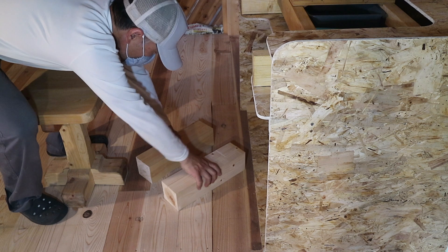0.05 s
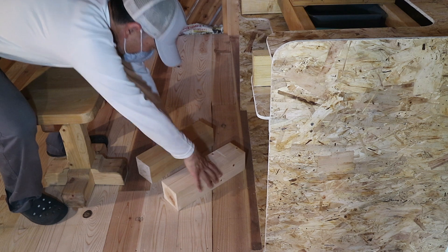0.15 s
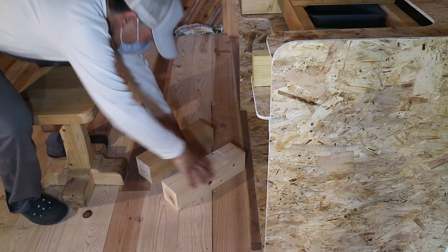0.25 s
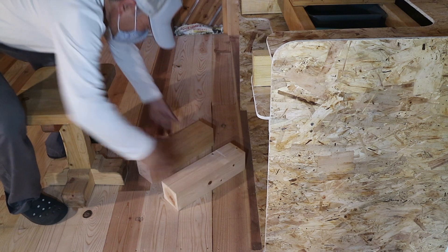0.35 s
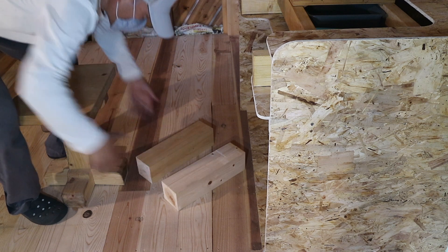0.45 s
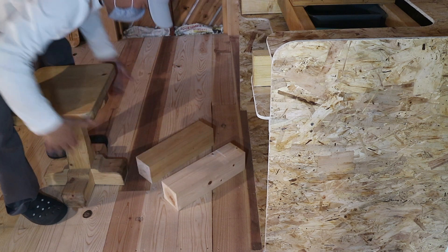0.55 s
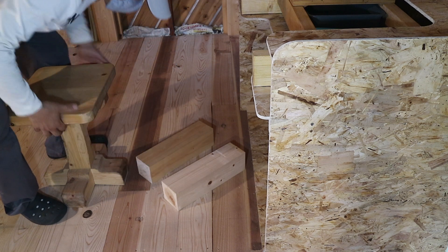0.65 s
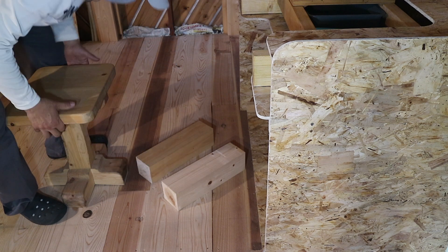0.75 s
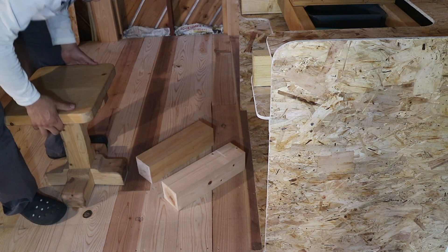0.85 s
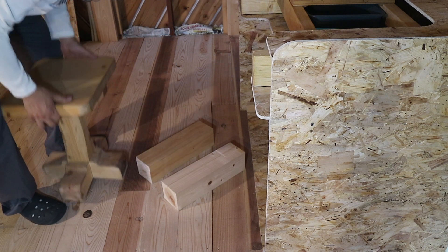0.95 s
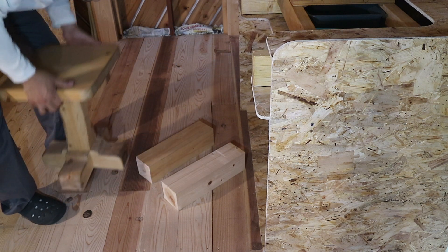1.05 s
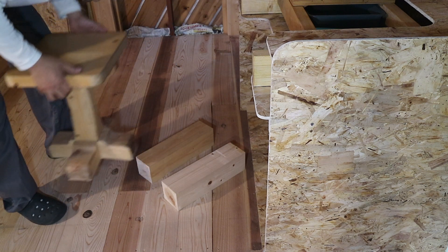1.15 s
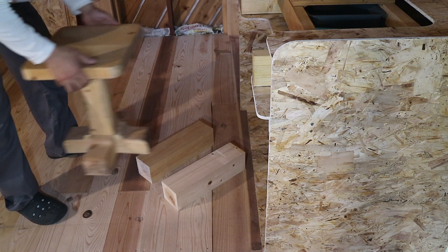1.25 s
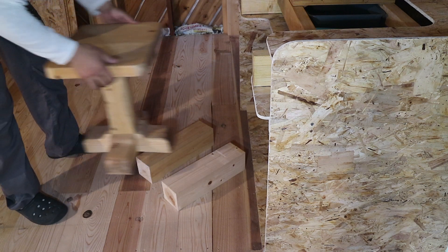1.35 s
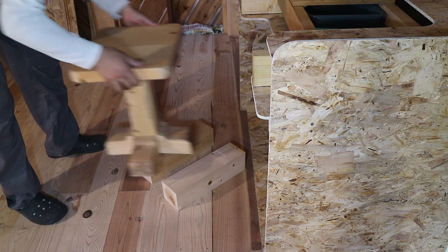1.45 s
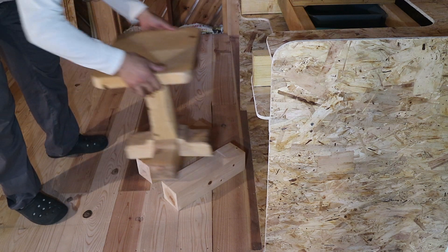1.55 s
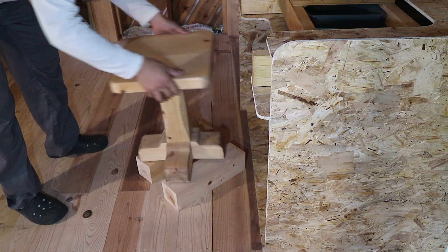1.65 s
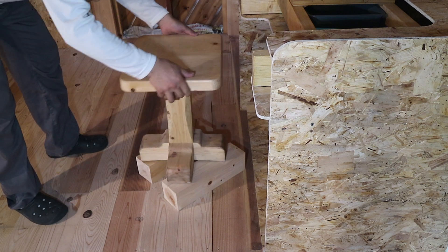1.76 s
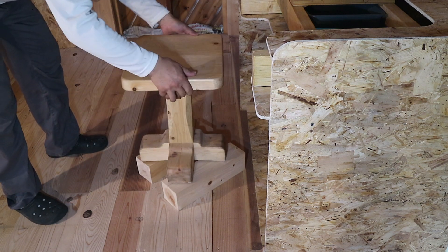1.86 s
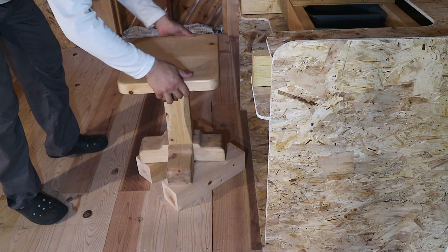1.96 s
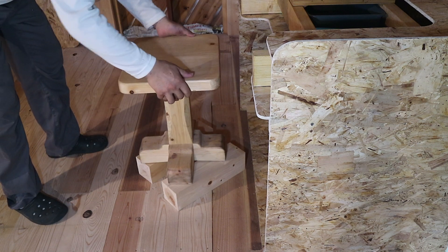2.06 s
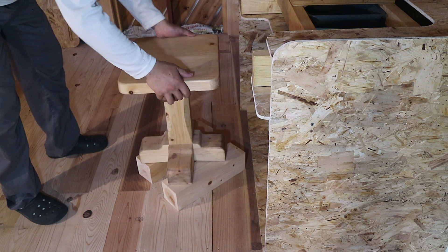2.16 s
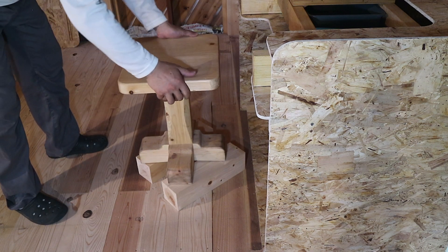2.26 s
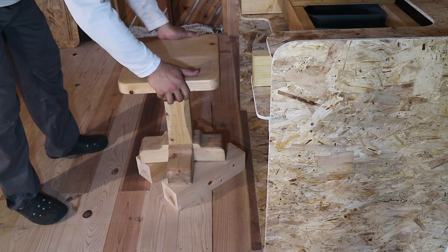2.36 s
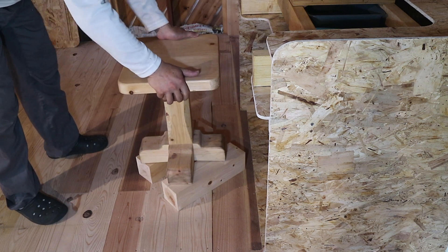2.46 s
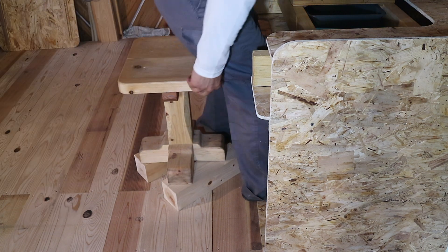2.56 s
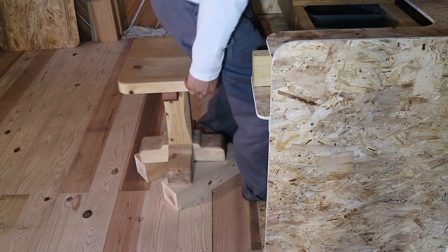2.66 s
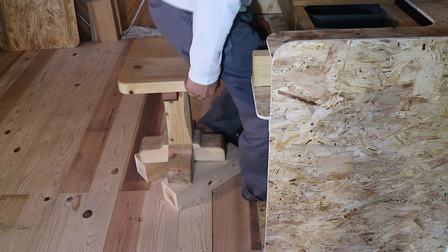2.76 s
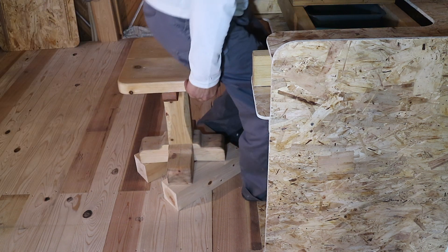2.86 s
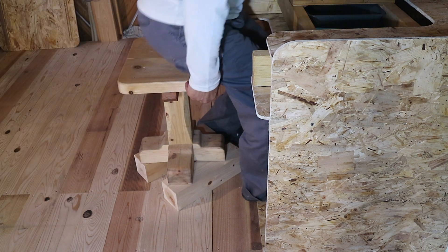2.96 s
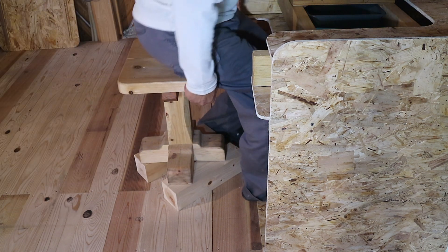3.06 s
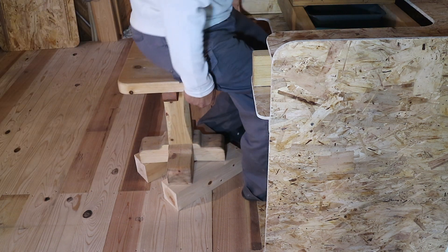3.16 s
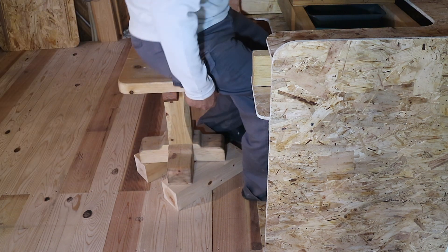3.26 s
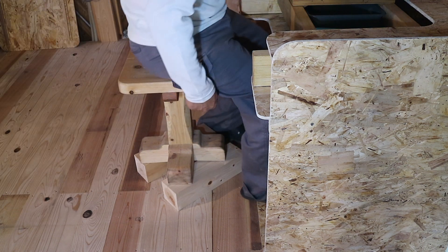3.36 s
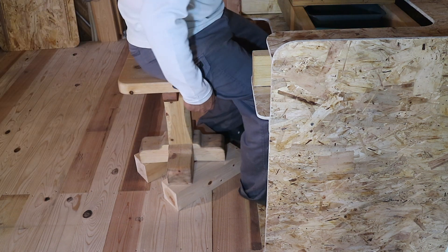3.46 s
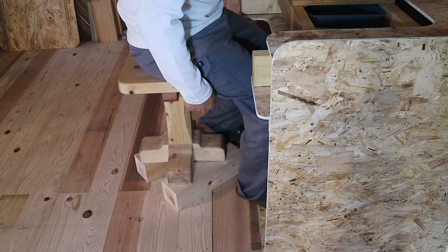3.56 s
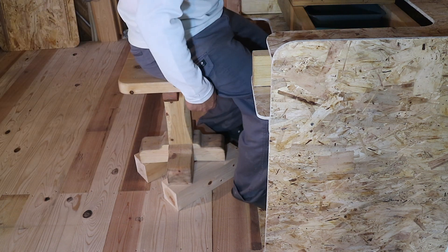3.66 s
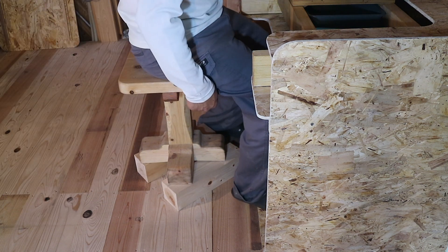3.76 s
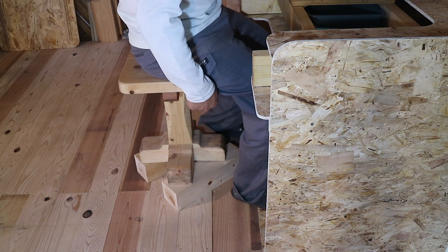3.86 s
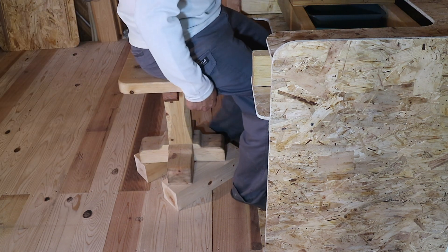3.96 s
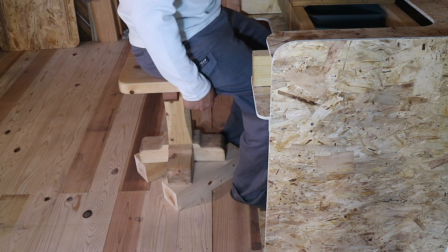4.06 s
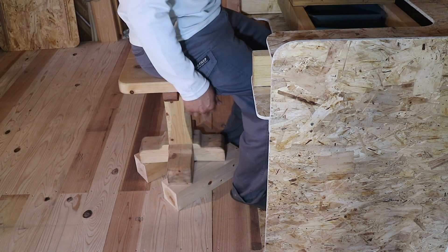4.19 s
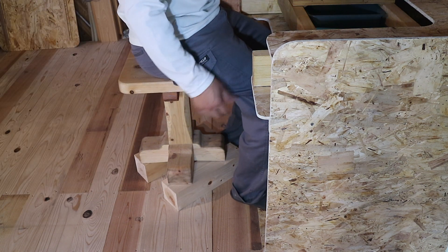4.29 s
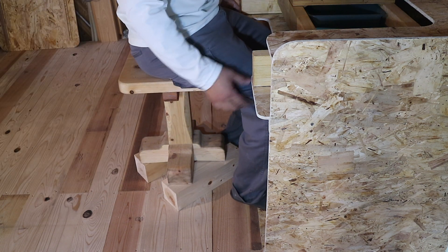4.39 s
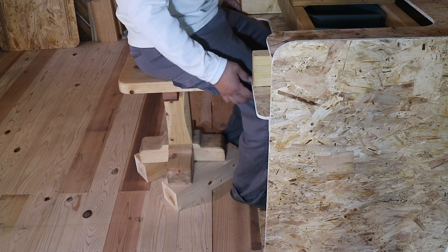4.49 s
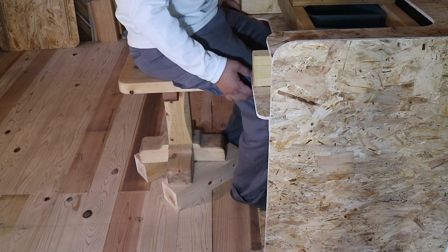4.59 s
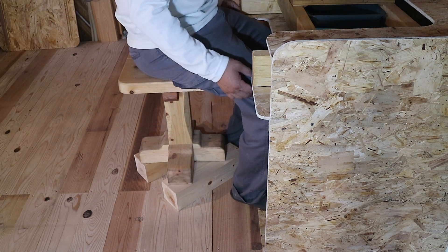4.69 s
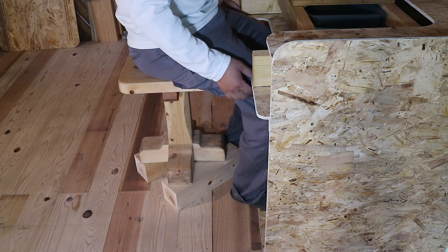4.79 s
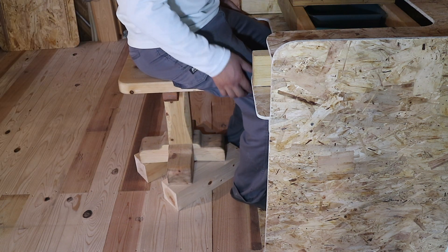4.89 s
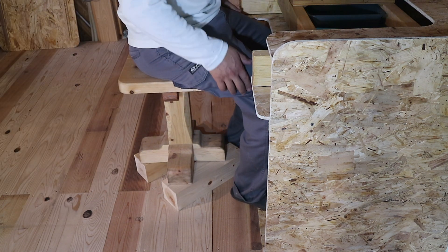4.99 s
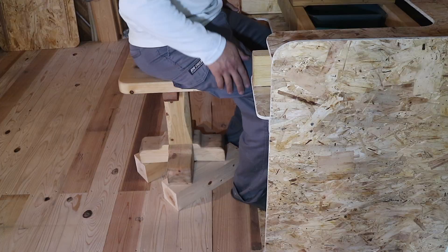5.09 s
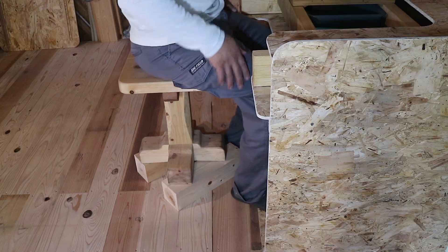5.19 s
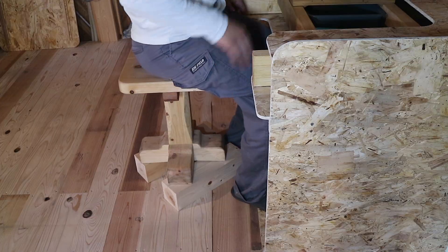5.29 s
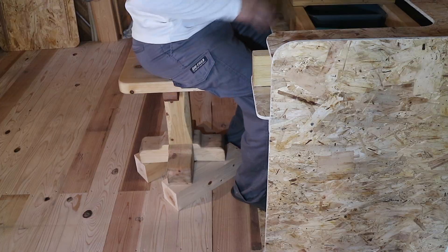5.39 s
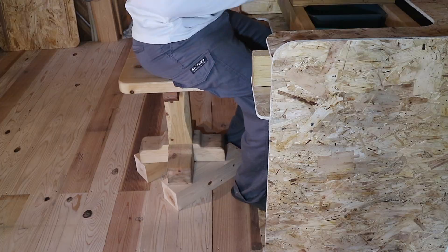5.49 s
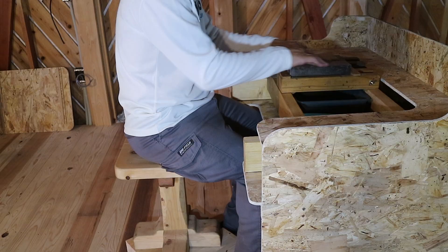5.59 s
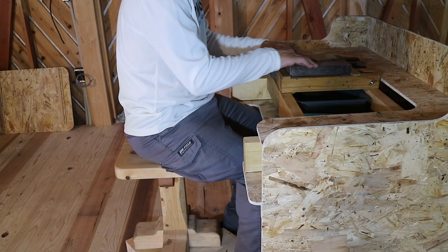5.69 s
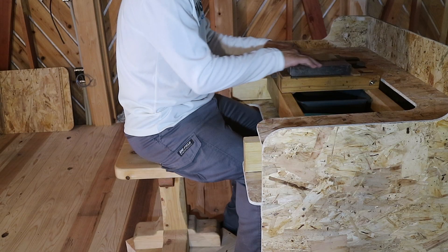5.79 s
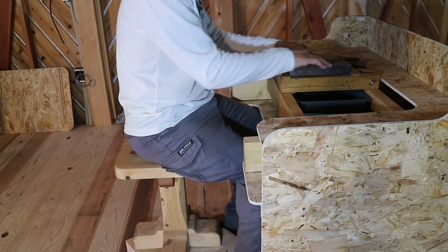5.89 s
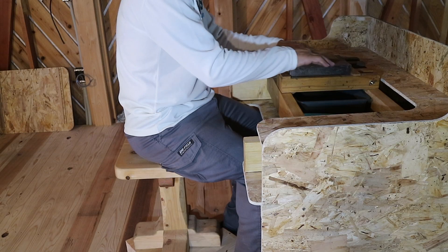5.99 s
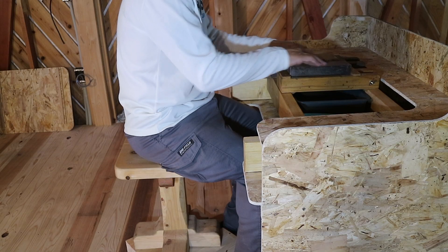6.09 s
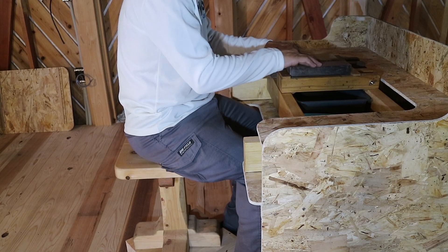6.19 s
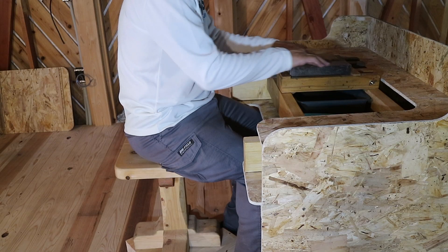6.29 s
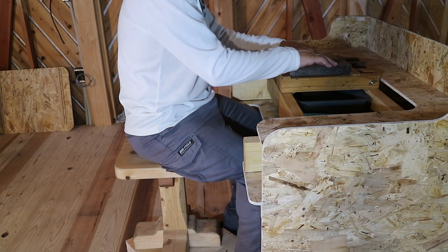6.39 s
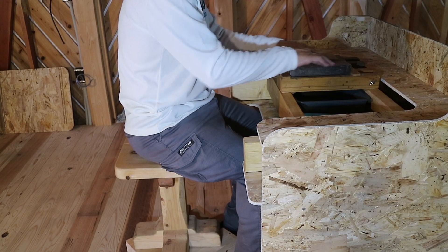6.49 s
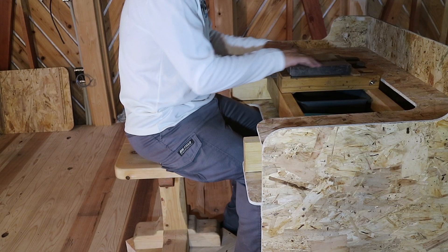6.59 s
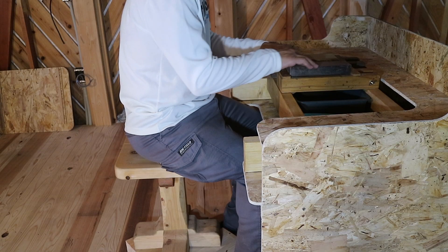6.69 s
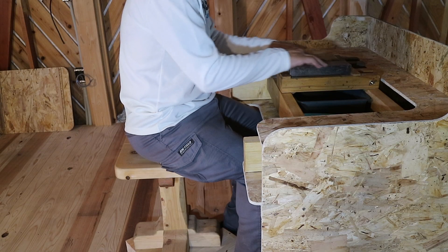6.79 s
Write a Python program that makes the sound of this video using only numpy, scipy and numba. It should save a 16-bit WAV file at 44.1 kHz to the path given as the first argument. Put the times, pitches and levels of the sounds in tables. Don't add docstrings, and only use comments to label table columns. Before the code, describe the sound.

Soft cloth rustle, then a loud hollow double clunk of a wooden stool, short drag, lighter knocks, a creak, and quiet blade-on-stone swishes.

```python
import sys
import numpy as np
from scipy import signal
from scipy.fft import rfft, irfft
from scipy.io import wavfile
from scipy.ndimage import uniform_filter1d
from numba import njit

SR = 44100
rng = np.random.default_rng(int(sys.argv[2]) if len(sys.argv) > 2 else 0)


def level_to_linear(level):
    exponent = np.asarray(level, float) / 20
    return 10 ** exponent


def put_to_file(sound):
    columns = np.atleast_2d(sound).T
    safe = np.clip(columns, -1, 1)
    whole_steps = np.round(safe * 32767)
    wavfile.write(sys.argv[1], SR, whole_steps.astype(np.int16))


N = 301644
TIME = np.arange(N) / SR
SIDES = np.array([[1], [-1]])


def unit(x):
    return x / np.sqrt(np.mean(x ** 2))


def band(x, lo_hz, hi_hz):
    sos = signal.butter(2, [lo_hz, min(hi_hz, .45 * SR)], "band", fs=SR, output="sos")
    return signal.sosfilt(sos, x)


def colour(x, table):
    log_hz = np.log(np.arange(N // 2 + 1) * SR / N + 1)
    hz, db = np.array(table).T
    return unit(irfft(rfft(x) * level_to_linear(np.interp(log_hz, np.log(hz), db)), N))


def wide(width):
    mid, side = rng.standard_normal((2, N))
    return mid + width * side * SIDES


def grit(rate_hz, spread_db):
    when, sign, size = rng.random((3, N))
    return (when < rate_hz / SR) * np.sign(sign - .5) * level_to_linear(-spread_db * np.log(size + 0.014))


def walk(rate_hz):
    k = int(SR / rate_hz)
    once = uniform_filter1d(rng.standard_normal(N), k)
    return unit(uniform_filter1d(once, k))


def swell(start_s, hold_s, db, rise_db_s, fall_db_s):
    early_s = np.maximum(start_s - TIME, 0)
    late_s = np.maximum(TIME - start_s - hold_s, 0)
    return level_to_linear(db - rise_db_s * early_s - fall_db_s * late_s)


@njit
def svf(x, hz, width_hz):
    y, b, l = np.empty(len(x)), 0., 0.
    for i in range(len(x)):
        g, k = np.tan(np.pi * hz[i] / SR), width_hz / hz[i]
        v = (b + g * (x[i] - l)) / (1 + g * (g + k))
        b, l, y[i] = 2 * v - b, l + 2 * g * v, k * v
    return y


def ring(body, scatter_db, thud_db, thud_s):
    t = np.arange(SR // 4) / SR
    hz, db, t60_s = np.array(body).T[:, :, None]
    weight, shift, detune, flip = rng.standard_normal((4, len(body), 1))
    fade = np.sign(flip + 1) * level_to_linear(db + scatter_db * weight - 60 * t / np.clip(t60_s, .004, .3))
    phase = 2 * np.pi * hz * (1 + .005 * detune) * t
    lag = 0.36 * shift * np.minimum(hz / 600, 1)
    modes = np.array([np.sum(fade * np.sin(phase + s * lag), axis=0) for s in (1, -1)])
    log_hz = np.log(np.arange(len(t) // 2 + 1) * SR / len(t) + 1)
    shape = level_to_linear(np.interp(log_hz, np.log(hz[:, 0]), db[:, 0], left=-40, right=-60))
    mid, side = irfft(rfft(rng.standard_normal(modes.shape)) * shape, len(t))
    thud = band(unit(mid + .38 * side * SIDES), 140, 16000) * np.exp(-t / thud_s)
    lowest_hz = body[0][0]
    return band(band(modes + level_to_linear(thud_db) * thud, 0.56 * lowest_hz, 9900), lowest_hz, 16000)


def knocks(contacts, body, pan_db, thud_db=3.0):
    out, t = np.zeros((2, N + SR)), np.arange(SR // 4) / SR
    push_t = t[:400]
    for s, peak_db, crack_db, ms in contacts:
        push = push_t * np.exp(-1000 * push_t / np.clip(ms, .02, 1))
        tone = signal.fftconvolve(ring(body, 0.81, thud_db, 0.017), push[None])[:, :len(t)]
        noise = rng.standard_normal(tone.shape)
        crack = band(noise, 2000, 4800) + level_to_linear(-27) * band(noise, 5000, 8200)
        crack = crack * np.exp(-t / 0.0069)
        blow = tone / np.abs(tone).max() + level_to_linear(crack_db) * crack / np.abs(crack).max()
        at = int(s * SR)
        out[:, at:at + len(t)] += blow * level_to_linear(peak_db + pan_db / 2 * SIDES)
    return out[:, :N]


def catches(rows, gain_db, cycles, overtone_db):
    out, t = np.zeros((2, N)), np.arange(SR // 10) / SR
    for s, peak_db, hz, pan_db in rows:
        fade = (1 - np.exp(-t / 0.001)) * np.exp(-t * hz / cycles)
        overtone = level_to_linear(overtone_db) * fade * np.sin(2 * np.pi * 2.18 * hz * t)
        tone = fade * (np.sin(2 * np.pi * hz * t) + overtone)
        at = int(s * SR)
        out[:, at:at + len(t)] += tone / np.abs(tone).max() * level_to_linear(peak_db + gain_db + pan_db / 2 * SIDES)
    return out


# t/s, peak level/dB, crack re peak/dB, contact time/ms
FIRST_FOOT = [
    (1.7005, -18.5, -33, 0.14),
    (1.7042, -12, -22, 0.21),
    (1.7163, -13.5, -18.5, 0.11),
    (1.7265, -15.5, -37.5, 0.32),
    (1.7503, -29.5, -44, 0.32),
    (1.7862, -23, -51, 0.21),
]
SLAM = [
    (1.7915, -6.5, -30.5, 0.083),
    (1.7955, -8.5, -51, 0.11),
    (1.8003, -10.5, -44, 0.095),
    (1.8115, -12, -51.5, 0.32),
    (1.8233, -20.5, -49, 0.24),
    (1.845, -19.5, -50, 0.13),
    (1.874, -22, -38, 0.3),
]
SETTLE = [
    (2.0050, -27, -28, 0.41),
    (2.0145, -29, -37, 0.64),
    (2.0243, -27.5, -22.5, 0.19),
    (2.0312, -35, -42.1, 0.76),
    (2.0573, -31.5, -45, 0.91),
    (2.0862, -43, -44, 1),
]
# mode f/Hz, level/dB, t60/s
FIRST_FOOT_BODY = [(76, -7.5, 0.19), (153, -16, 0.22), (232, -14.5, 0.16), (266, -8.5, 0.16),
                   (315, 1, 0.036), (354, -5, 0.07), (463, -6.5, 0.043), (551.4, 2, 0.043),
                   (776, -4.5, 0.11), (927, 1, 0.048), (1091, -7, 0.066), (1260, -5.5, 0.037),
                   (1710, -10.5, .04), (2050, -12, 0.047), (2600, -12.5, .03)]
SLAM_BODY = [(78.6, -24, 0.16), (148, -15.5, 0.14), (233, -22, 0.35), (325, -11, 0.15), (430, -7.5, 0.12),
             (516, -7, 0.05), (607, 0.5, .2), (647, -3.5, .09), (756, -11.5, .07), (839, 1, 0.05),
             (1000, -3.5, .07), (1116, -2.5, .06), (1197, 3, 0.058), (1400, -10, 0.047), (1650, -12, 0.032),
             (1810, -8.5, 0.07), (2004, -10.5, 0.07), (2300, -11.5, .06), (2610, -40.5, 0.022),
             (3230, -24.5, 0.035)]
SETTLE_BODY = [(87.5, 2, 0.022), (151, -18, 0.039), (241, 7.5, 0.025), (352.5, 2.5, 0.063),
               (509, 10, 0.018), (615, -3.5, 0.04), (1255, -3, 0.05), (1780, -10.5, .04)]


def set_down():
    first = knocks(FIRST_FOOT, FIRST_FOOT_BODY, .7, thud_db=0.5)
    slam = knocks(SLAM, SLAM_BODY, .9, thud_db=5.5)
    return first + slam + knocks(SETTLE, SETTLE_BODY, 2.2)


ROCK = [
    (2.7543, -31, -5, 0.05),
    (2.8473, -41, -34, 0.14),
    (2.9612, -43.5, -27, 0.18),
    (3.0583, -35, -8, 0.11),
    (3.0635, -26, -18, 0.044),
    (3.0680, -25.5, -16, 0.19),
    (3.0735, -26, -30, 0.3),
    (3.0973, -36, -28, 0.18),
]
SIT = [
    (3.5005, -29.5, -3.5, 0.1),
    (3.5055, -29, -28, 0.075),
    (3.5105, -22.5, -16.5, 0.1),
    (3.5158, -27, -33, 0.19),
    (3.5273, -34, -30, 0.059),
    (3.5423, -35, -34, 0.18),
    (3.5703, -43, -36, 0.076),
]
ROCK_BODY = [(250, -22, 0.1), (293, -12, 0.26), (380, 2.5, 0.091), (504, 2.5, 0.14), (668, -1.5, 0.047),
             (740, 3, 0.17), (938, 5.5, 0.061), (1110, 0, 0.02), (1400, 4.5, 0.087), (1970, 5, 0.046),
             (2170, -2, 0.059), (2465, -9.5, 0.26), (3130, -16, 0.31)]
SIT_BODY = [(289, 2.5, 0.093), (400, -0.5, 0.09), (471.5, 3, 0.1), (562, -6, 0.078), (746, -1.5, 0.19),
            (940, -8.5, 0.15), (1213, -5.5, 0.043), (1464, 0, 0.062), (1630, -0.5, 0.054), (2050, -5, 0.28),
            (2480, -9, 0.27), (2980, -11, 0.22)]


def rock_and_sit():
    return knocks(ROCK, ROCK_BODY, -0.65, thud_db=9.5) + knocks(SIT, SIT_BODY, -0.73, thud_db=8.5)


# t/s, peak level/dB, f/Hz, pan/dB
ANSWERS = [(1.7935, -14, 1190, -1), (1.7965, -9.5, 858, 0), (1.8035, -21.5, 1910, 2),
           (1.8055, -14, 890, 2.5), (1.8105, -11.5, 645, -1), (1.8295, -22.5, 617, -2),
           (1.8405, -25.5, 607, 2), (1.8565, -29, 1005, 2), (1.8805, -29.5, 1000, 2),
           (2.0215, -32.5, 346, 2), (2.0765, -43.5, 560, -0.3), (3.0675, -25, 382, 0.5),
           (3.0785, -32, 368, -2), (3.0805, -44, 3100, -.9), (3.0965, -37.5, 423, -3),
           (3.1155, -43, 2470, -1.1), (3.1245, -42, 742, -1.1), (3.1405, -50, 2470, -.9),
           (3.5095, -30.5, 398, -1.1), (3.5435, -35, 485, -1.1), (3.5305, -46, 2980, -.9),
           (3.5605, -45, 2480, -1.1), (3.6005, -44, 962, -1.1), (3.6205, -54, 2150, -1.1),
           (3.6655, -52.5, 452, -1.1)]


def answers():
    return catches(ANSWERS, -2.9, 5.0, -26)


# start t/s, hold/s, level/dB, low f/Hz, high f/Hz of the part excited
DRAG = [(1.278, 0.069, -63.5, 300, 400), (2.771, 0.065, -41.5, 91, 5200), (2.762, 0.084, -53, 2200, 5760),
        (2.833, 0.06, -55, 80, 217), (2.862, 0.026, -60, 246, 1500), (2.978, 0.016, -50.5, 213, 380),
        (2.993, 0.054, -64.5, 1610, 1900), (3.926, 0.047, -64.5, 430, 566),
        (3.928, 0.079, -62.5, 1060, 1400), (4.058, 0.014, -53, 700, 805), (4.095, 0.025, -57, 426, 560),
        (4.076, 0.041, -56, 1050, 1336), (4.12, 0.02, -64, 280, 503), (4.902, 0.037, -62, 1500, 2600),
        (5.056, 0.03, -62.5, 1010, 1910)]
# mode f/Hz, level/dB, t60/s
DRAG_BODY = [(125, -7.5, 0.4), (266, -2, 0.066), (346, 0, 0.036), (485, -6.5, 0.012), (767, -4, 0.079),
             (1100, 10.5, 0.0047), (1500, 2, 0.022), (1980, -2, 0.034), (2800, -38, .008),
             (3740, -37, 0.0051), (5000, -26, .005)]


def drag():
    slips = 0
    for _ in range(3):
        foot = ring(DRAG_BODY, 0.94, 1.0, 0.012)
        slips = slips + signal.fftconvolve(grit(520, 2.6)[None], foot)[:, :N]
    return sum(swell(s, hold_s, db, rise_db_s=816, fall_db_s=470) * unit(band(slips, lo_hz, hi_hz))
               for s, hold_s, db, lo_hz, hi_hz in DRAG)


# t/s, peak level/dB, f/Hz, pan/dB
CATCHES = [(2.758, -31, 816, -3), (2.764, -37, 242, 1.5), (2.77, -26.5, 460, 4), (2.775, -24.5, 416, -5),
           (2.78, -36, 437, -0.5), (2.786, -29, 463, 0.0), (2.798, -33, 280, 0.0), (2.807, -27, 706, 2.5),
           (2.812, -35, 375, 0.0), (2.825, -34, 380, 0.5), (2.835, -31, 789, 0.0), (2.842, -35, 266, 7),
           (2.847, -31, 415, -1.5), (2.855, -42, 320, -0.5), (2.868, -35, 270, 5)]


def grain_catches():
    return catches(CATCHES, -6.0, 1.3, -3)


# t/s, peak level/dB, f/Hz, pan/dB
CREAK = [(4.041, -49, 783, -2.5), (4.051, -39, 764, -1.0), (4.059, -38, 767, -0.5), (4.068, -46, 854, -1.0),
         (4.076, -43, 410, -1.0), (4.081, -54, 405, -1.0), (4.088, -37, 720, 0), (4.098, -37, 436, 4),
         (4.104, -38, 710, 1), (4.11, -38, 510, -1.0), (4.118, -45, 541, 2), (4.123, -50, 770, 2.0),
         (4.129, -44, 325, -3), (4.14, -50, 385, 2.0), (4.148, -45, 293, 0.5)]


def creak():
    return catches(CREAK, -7.5, 3.2, -19)


BLOCK_DOWN = [
    (.0012, -42.5, -34, 0.88),
    (.0163, -49, -29, 1),
    (.0503, -51, -36, 1),
]
TAPS = [(.1543, -51.5, 3, 0.1), (.2243, -80, -19, 1), (.7443, -48.5, -22, 0.15), (.9000, -46, -5, 0.076),
        (.9143, -56.5, -28, 0.11), (1.3043, -46.5, -25.5, 0.23), (1.4073, -51.5, -31, 0.47),
        (2.3443, -65, -19, 0.15), (4.4683, -53, 1.5, 0.024), (4.5843, -49, -3.5, 0.087),
        (4.9203, -57, -10.5, 0.038), (5.0043, -54.5, -0.5, 0.89)]
TAP_BODY = [(300, 3, 0.038), (380, 1, .05), (615.4, -3.5, 0.025), (800, -18.5, 0.095), (1110, -3.5, .05),
            (1500, 1, 0.094), (1770, 1, .05), (2230, 1, .06), (3060, -11.5, 0.024)]


def small_knocks():
    return knocks(TAPS, TAP_BODY, 0.96) + knocks(BLOCK_DOWN, SETTLE_BODY, 1.0)


# start t/s, length/s, hiss level/dB
SLIDES = [
    (2.597, 0.21, -66.5),
    (2.964, 0.51, -70),
    (3.637, 0.507, -68.5),
]
# t/s, hold/s, level/dB
SHUDDERS = [
    (2.832, 0.018, -52),
    (3.1, 0.018, -49.5),
    (3.28, 0.17, -58),
    (3.547, 0.012, -49),
    (3.67, 0.086, -59),
    (3.974, 0.022, -58),
    (4.086, 0.028, -50),
]
# t/s, f/Hz
RIDGE = [(2.575, 5000), (2.62, 6700), (2.67, 6800), (2.86, 6750), (2.95, 4800), (3.0, 5500), (3.06, 6470),
         (3.25, 6500), (3.26, 6400), (3.29, 6750), (3.5, 6850), (3.62, 4800), (3.66, 5500), (3.715, 6500),
         (3.88, 6480), (3.9, 6300), (3.96, 6750), (4.15, 6850)]
RIDGE_SHARES = [1, .935, .62, .645, .545, .33]


def soles():
    top_hz = uniform_filter1d(np.interp(TIME, *np.array(RIDGE).T), size=600)
    off_khz = np.abs(6500 - top_hz) / 1000
    ridges = [(80, -4), (900, -1.5), (2600, 3), (150, -9), (130, -10), (1500, -2)]  # width/Hz, level/dB
    hiss = 0
    for share, (width_hz, db) in zip(RIDGE_SHARES, ridges):
        centre_hz = share * top_hz
        ridge = np.array([svf(svf(c, centre_hz, 1. * width_hz), centre_hz, 1. * width_hz) for c in wide(1.13)])
        if width_hz < 500:
            db = db - 22 * off_khz
        flutter_db = walk(14) * 1.3 * min(250 / width_hz, 1)
        hiss = hiss + level_to_linear(db + flutter_db) * unit(ridge)
    rough = wide(0.78) + 0.048 * unit(grit(590, 2.6))
    rumble = band(rough, 200, 1990) + level_to_linear(-5.0 + 2.3 * walk(7.6)) * band(rough, 350, 840)
    sliding = sum(swell(*row, rise_db_s=698, fall_db_s=252) for row in SLIDES)
    shudder = np.max([swell(*row, rise_db_s=134, fall_db_s=123) for row in SHUDDERS], axis=0)
    rumble_gain = np.maximum(level_to_linear(4) * sliding, shudder)
    return sliding * hiss + rumble_gain * unit(rumble)


# start t/s, length/s, mid-stroke level/dB
STROKES = [
    (5.624, 0.16, -66.5),
    (5.809, 0.23, -66),
    (6.068, 0.18, -67),
    (6.267, 0.22, -66),
    (6.529, 0.21, -64),
    (6.763, 0.16, -67),
]
# f/Hz, density level/dB
STONE = [(1800, -21), (2700, -4.5), (4500, -2.5), (6500, -4), (8500, -7), (11000, -13.5), (13000, -18),
         (15000, -26)]


def whetstone():
    gain = 0
    for s, length_s, db in STROKES:
        speed = np.sin(np.pi * np.clip((TIME - s) / length_s, 0, 1)).clip(0)
        gain = gain + level_to_linear(db) * speed ** 0.62
    return gain * colour(wide(1.02) + 0.39 * unit(grit(1500, 2.27)), STONE)


def bench():
    gain = swell(5.69, 2, -69 + walk(6.6), rise_db_s=64, fall_db_s=60)
    return gain * unit(band(wide(1.0), 625, 1230))


# t/s, dull creasing level/dB
EFFORT = [(0.0, -61), (.4, -66.5), (.74, -60), (.86, -59), (.92, -59.5), (1.1, -61), (1.3, -57),
          (1.6, -64.5), (2.34, -62), (2.5, -63), (4.24, -60), (4.55, -63), (4.61, -56.5), (4.78, -64.5),
          (5.04, -57), (5.36, -63.5), (5.75, -61.5), (6.84, -59)]
# start t/s, hold/s, level/dB, centre f/Hz, width/Hz
BRUSHES = [(0.15, 0.14, -72.5, 3610, 3600), (0.71, .101, -72, 3100, 3300),
           (0.957, 0.092, -69.5, 3000, 4300), (1.174, .19, -71.5, 3800, 1900), (2.2, 0.12, -76, 3930, 1960),
           (2.27, 0.061, -66.5, 1530, 450), (4.478, .011, -88, 2800, 2950), (4.586, .02, -90, 3290, 3200),
           (4.3, .029, -65.5, 3300, 3000), (4.878, .21, -69.5, 1800, 1800), (4.581, 0.18, -75, 1510, 1400),
           (5.211, 0.15, -80.5, 3700, 4900), (5.505, 0.1, -73, 4100, 1110), (0.34, 0.29, -81, 4700, 5700)]
# start t/s, hold/s, level/dB
FLEXES = [(0.205, 0.033, -64), (0.74, 0.063, -77), (.92, 0.026, -72), (1.66, 0.022, -72.5),
          (2.182, 0.013, -62.5), (2.661, 0.034, -76), (3.1, 0.044, -65), (3.308, 0.046, -69.5),
          (3.522, 0.036, -65), (3.71, 0.035, -73), (4.138, 0.027, -85), (4.343, 0.079, -80),
          (5.849, 0.025, -71.5), (6.042, 0.038, -81), (6.361, 0.26, -73), (6.662, 0.27, -83)]


def clothes():
    dull = unit(band(wide(1.0), 98, 977))
    noise = wide(0.88) + 0.22 * unit(grit(500, 2.5))
    sheen = level_to_linear(-20.5) * band(noise, 4600, 8000)

    def bright(hz, width_hz):
        return unit(band(noise, hz - width_hz / 2, hz + width_hz / 2) + width_hz / 3000 * sheen)

    planks = unit(band(wide(0.2), 40, 140))
    effort = level_to_linear(np.interp(TIME, *np.array(EFFORT).T)) * level_to_linear(-2.24 + 1.8 * walk(14))
    brushes = sum(swell(s, hold_s, db, rise_db_s=405, fall_db_s=245) * bright(hz, width_hz)
                  for s, hold_s, db, hz, width_hz in BRUSHES)
    flexes = sum(swell(*row, rise_db_s=151, fall_db_s=155) for row in FLEXES)
    creasing = effort * (dull + level_to_linear(-15) * bright(3700, 3500))
    return creasing + brushes + (flexes + level_to_linear(-23.5) * effort) * planks


# f/Hz, t60/s, level/dB, stereo width
ROOM = [(73.5, 0.23, -2.5, .18), (143, 0.064, 6, .45), (292, 0.11, -1.5, .85), (615, 0.31, -2, .8),
        (1250, 0.37, -3.5, 1.1), (2460, 0.51, -2, .9), (4715, .25, 3, 1.1), (9600, 0.42, 1.5, 0.8)]


def room(dry):
    t = np.arange(SR // 2) / SR
    tail = 0
    for hz, t60_s, db, width in ROOM:
        mid, side = unit(band(rng.standard_normal((2, len(t))), hz / 1.536, hz * 1.16))
        both = mid + width * side * SIDES
        tail = tail + both * np.sqrt(hz / t60_s) * level_to_linear(db - 60 * t / t60_s)
    tail = tail * (1 - np.exp(-t / 0.0027))
    tail = tail / np.sqrt(np.sum(tail ** 2) / 2)
    return level_to_linear(-4) * signal.fftconvolve(dry.mean(axis=0)[None], tail)[:, :N]


# f/Hz, density level/dB
HUSH = [(20, -0.5), (40, -12.5), (60, -14.5), (100, 2.5), (150, -9), (300, -2), (600, -27.5), (1300, -10),
        (2500, -15), (4000, -19), (6300, -25.5), (10000, -33.5), (13000, -40), (16000, -59)]
# f/Hz, density level/dB
HUSH_SIDE = [(40, -33), (100, -11.5), (190, 1), (400, 0.5), (900, -8), (2500, -17.5), (6000, -25),
             (14000, -47)]


def hush():
    mid = colour(rng.standard_normal(N), HUSH)
    side = colour(rng.standard_normal(N), HUSH_SIDE)
    return level_to_linear(-69) * mid + level_to_linear(-60.5) * side * SIDES


def scene():
    wood = set_down() + rock_and_sit() + answers() + drag() + grain_catches() + creak() + small_knocks()
    return wood + room(wood) + soles() + whetstone() + bench() + clothes() + hush()


def top_cut(x):
    return signal.sosfilt(signal.butter(12, 14900, fs=SR, output="sos"), x)


def record(dry):
    heard = signal.sosfilt(signal.butter(3, 50, "high", fs=SR, output="sos"), dry)
    heard = heard + 0.4 * band(heard - heard.mean(axis=0), 10000, 16000)
    return top_cut(heard)


dry = scene()
out = record(dry)
put_to_file(out)
```